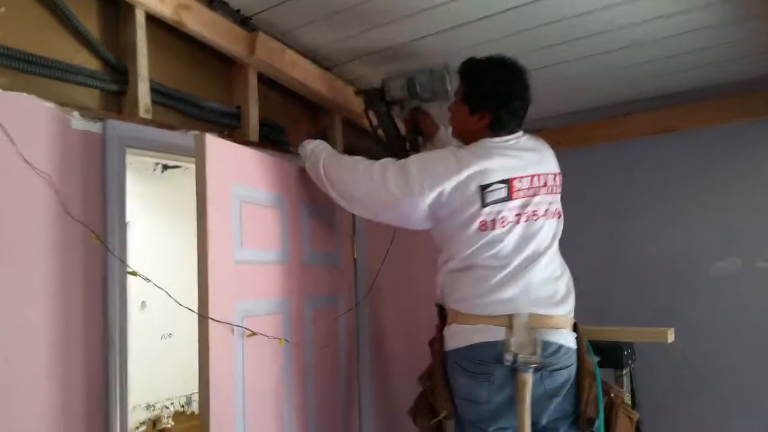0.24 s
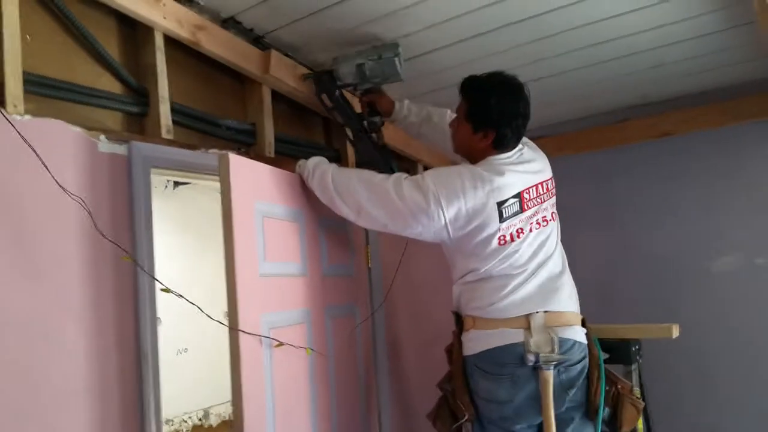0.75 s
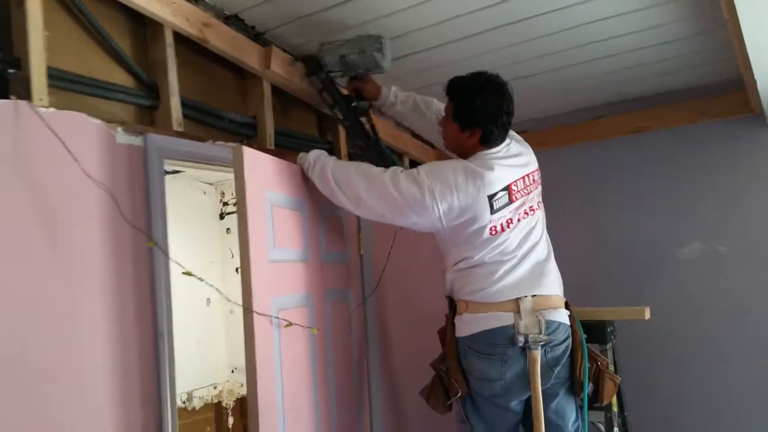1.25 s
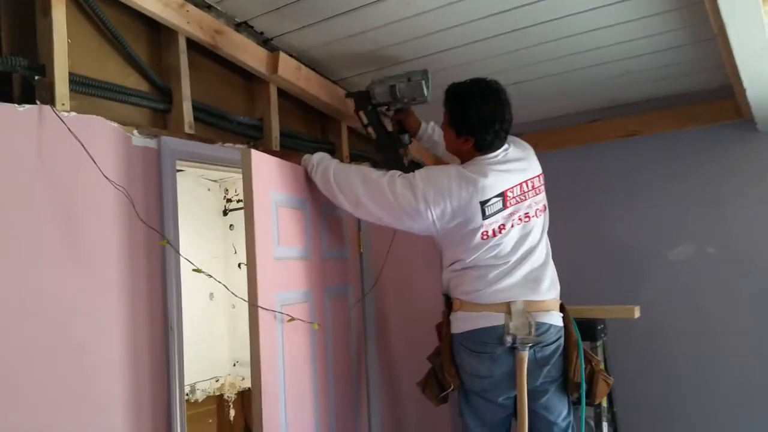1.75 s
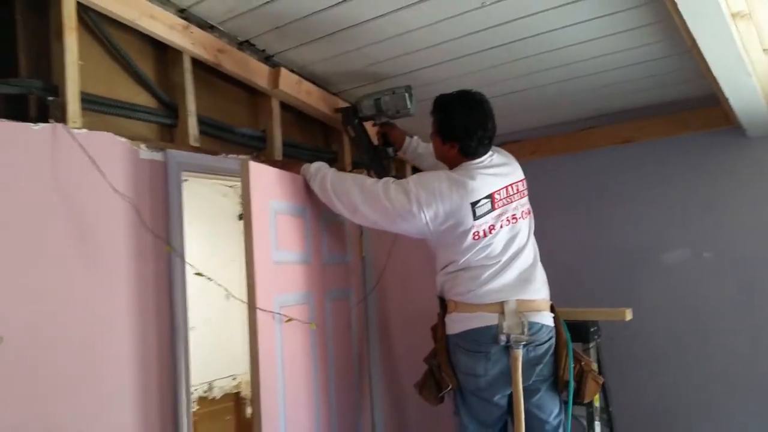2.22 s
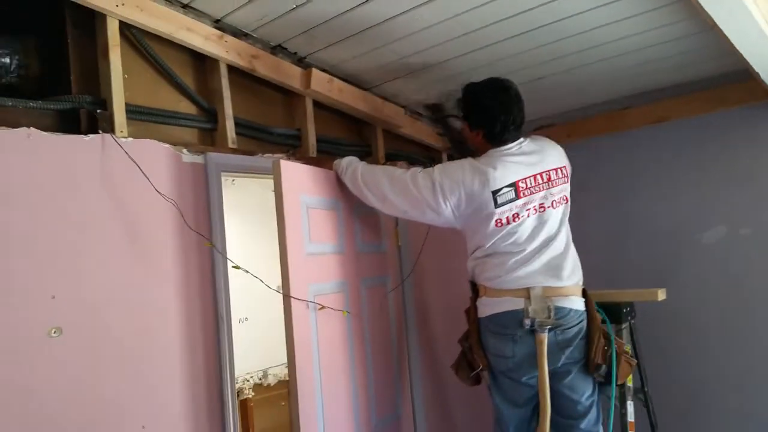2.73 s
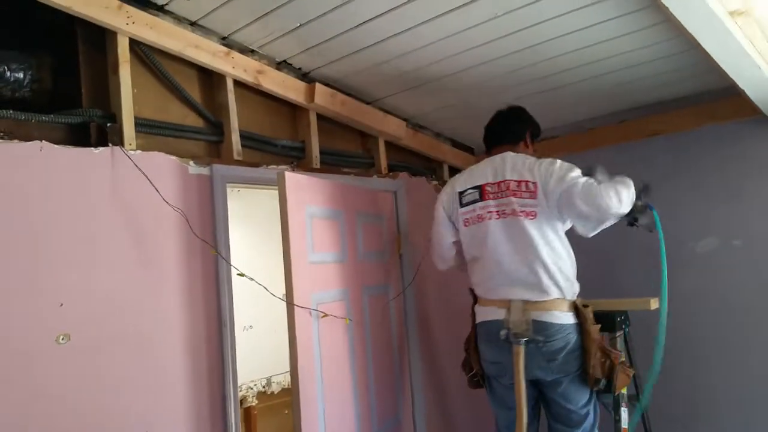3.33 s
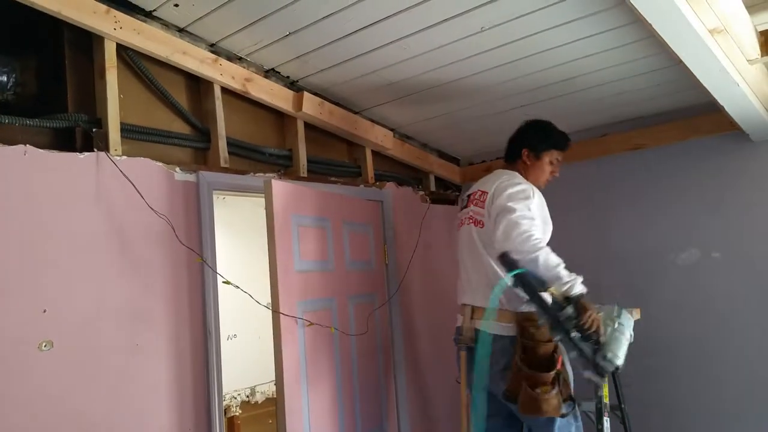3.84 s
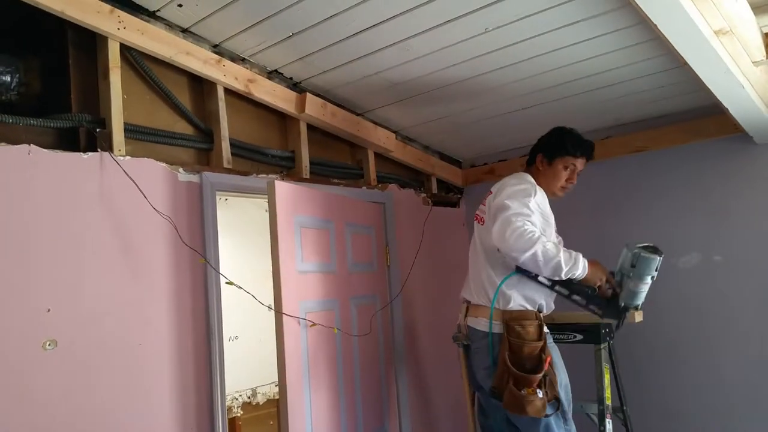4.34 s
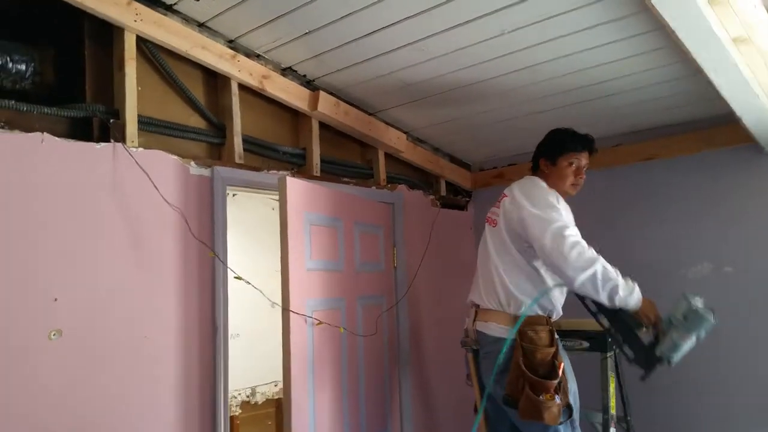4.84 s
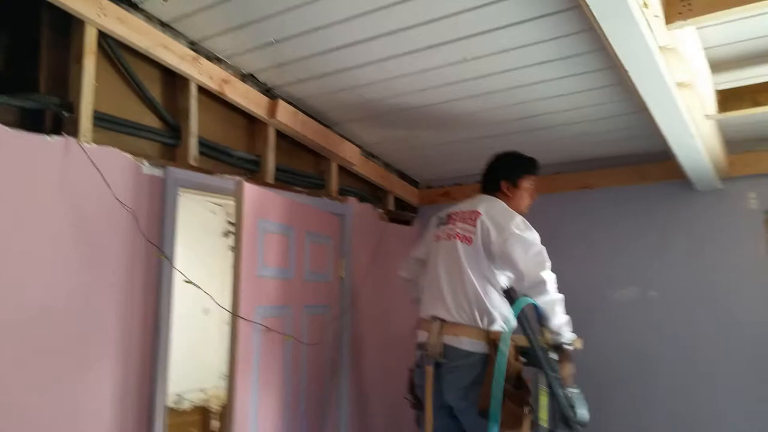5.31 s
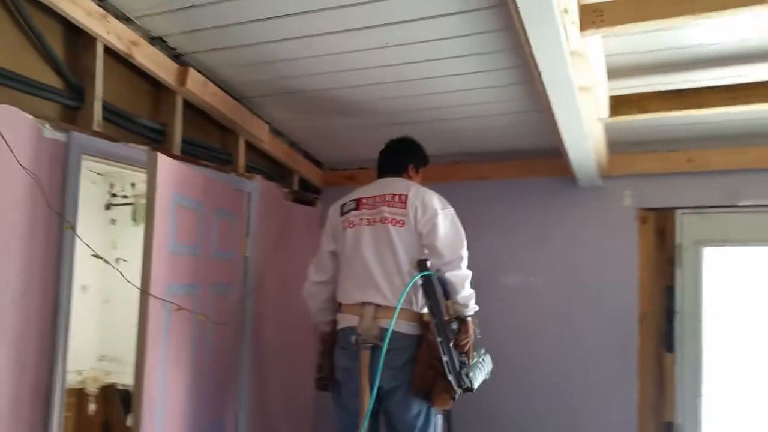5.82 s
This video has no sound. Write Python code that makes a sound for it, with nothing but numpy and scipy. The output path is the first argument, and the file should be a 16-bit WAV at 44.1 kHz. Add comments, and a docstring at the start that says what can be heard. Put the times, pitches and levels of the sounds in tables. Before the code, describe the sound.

A small air compressor fades in, humming and buzzing steadily with a rough clatter in a bare room. An air nail gun fires twice into a wooden beam, about a second apart, each shot a sharp double crack with a thud and a rush of air. The compressor sounds quieter after each blow, then swells back. Light clicks, brief metal squeaks and a clank follow as the tool is lowered. The microphone moves slightly.

```python
"""Air compressor and nailer in a bare room

A small piston compressor hums and buzzes at harmonics of its shaft rate, over the noise of its valves.
An air nailer fires twice into a beam: each impact excites housing and timber, and exhaust air follows.
The tool is then lowered with squeaks, scuffs and a clank. The sound fades in at a moving microphone,
whose gain control holds the compressor down for a while after each loud blow."""
import sys
import numpy as np
from scipy import signal
from scipy.fft import rfft, irfft
from scipy.io import wavfile
from scipy.ndimage import uniform_filter1d, minimum_filter1d

SR = 44100
rng = np.random.default_rng(int(sys.argv[2]) if len(sys.argv) > 2 else 0)


def store_wav(level_fs):
    """Save 16-bit WAV to argv[1]."""
    pcm = np.round(np.clip(np.atleast_2d(level_fs), -1, 1) * 32767)
    wavfile.write(sys.argv[1], SR, pcm.T.astype(np.int16))


N = 267687
TIME = np.arange(N) / SR
FREQS = np.fft.rfftfreq(N, 1 / SR)
SHAFT_HZ, SLOWING_HZ_PER_S = 44.0, 0.027

# Harmonics of the pump's hum: shaft order, relative level/dB
HUM_ORDERS = [(1, -35), (2, -21.5), (3, -17.5), (4, -35.5), (5, -3.5), (6, -18), (7, -12.5), (8, -8),
              (9, -9), (10, -11), (11, -20.5), (12, -9), (13, -3), (14, -6), (15, 0.5), (16, -7), (17, 0),
              (18, -2), (19, -5.5), (20, -11)]
# Spectral envelope of the pump's metal buzz: f/Hz, relative level/dB
BUZZ_ENVELOPE = [(860, -40), (1300, -45), (1600, -45), (2200, -36.5), (2700, -46), (3500, -56),
                 (4500, -50.5), (6000, -58.5), (9000, -84)]
# Resonances that lift the nearest shaft order: f/Hz, relative level/dB
PUMP_RESONANCES = [(1007, -37), (1050, -40), (1098, -40.5), (1227, -43), (1270, -37), (1314, -40),
                   (1362, -37), (1448, -38), (1620, -41), (1841, -49), (2019, -46), (2148, -38.5),
                   (2191, -34.5), (2326, -39), (2369, -40.5), (4167, -47), (4474, -40.5), (4780, -42.5)]
# Spectrum of valve clatter and intake air: f/Hz, relative density/dB
CLATTER_SPECTRUM = [(30, -23), (70, -21.5), (160, -9), (330, -5), (750, 3), (1050, 0.5), (1600, -1),
                    (2300, 0.5), (2850, -12.5), (3600, -14.5), (4600, -15), (6200, -20.5), (7500, -19.5),
                    (8300, -24), (9700, -22), (11000, -25), (12000, -22.5), (15500, -29)]
# Likeness of the clatter at the two ears: f/Hz, coherence (0-1)
CLATTER_COHERENCE = [(40, 0.2), (200, 1), (600, 0.54), (1100, 0.61), (3000, 0.32), (12000, 0.12)]
# Stereo balance of the compressor: f/Hz, left minus right level/dB
PUMP_BALANCE = [(80, 2.5), (220, -1), (450, 1.5), (640, 4.5), (780, -0.5), (1100, -1.5), (1700, -1.5),
                (4000, 0.5), (12000, -1.5)]
# Nailer shots: t/s, crack level/dB, driver return level/dB, timber level/dB, air decay time/s
NAIL_SHOTS = [(1.182, 10, 3, 1, .13), (2.389, 8.5, 4.5, -8.5, 0.12)]
# Spectrum of the driver's impact: f/Hz, relative density/dB
CRACK_SPECTRUM = [(60, -10), (300, -3), (700, 6.5), (1200, 4), (2100, 5), (3000, 1.5), (5700, -0.5),
                  (8000, -6), (15500, -9)]
# Spectrum of the struck beam and wall: f/Hz, relative density/dB
TIMBER_SPECTRUM = [(30, -13), (45, -32), (62, 0), (100, -13), (140, 4.5), (200, -1), (330, 0), (600, -10.5),
                   (1100, -10.5), (2500, -26), (9000, -60)]
# Spectrum of the escaping air: f/Hz, relative density/dB
AIR_SPECTRUM = [(50, -35), (160, -25), (400, -2), (640, 2), (900, -7), (1800, -3), (3000, -8), (5500, -10),
                (9000, -11), (15700, -9)]
# Resonances of the nailer's metal housing: f/Hz, bandwidth/Hz, lift/dB
HOUSING_MODES = [(1890, 67, 1), (3480, 180, 1), (5600, 630, 5)]
# Clicks and scuffs of the handled tool: t/s, level/dB, decay time/s, centre f/Hz
HANDLING_BURSTS = [(1.07, -21.5, 0.0077, 10750), (2.328, -17, 0.0086, 5070), (3.09, -22, 0.011, 4940),
                   (4.7, -33, 0.17, 6500), (4.868, -25, 0.055, 6060), (4.955, -18, 0.03, 9000),
                   (4.968, -8, .022, 3300), (5.086, -19, 0.012, 5970), (5.484, -22, 0.0029, 4680),
                   (5.65, -23, 0.0061, 7430)]
# Metal squeaks and rings as the worker shifts: t/s, level/dB, duration/s, f/Hz, spread/Hz
METAL_SQUEAKS = [(3.947, -14, 0.022, 3300, 12), (4.057, -14.5, 0.027, 820, 28),
                 (4.068, -27, .025, 2595, 32), (4.071, -17.5, 0.048, 1195, 33),
                 (4.965, -8.5, 0.02, 1786, 67), (4.967, -12, 0.026, 1967, 680),
                 (5.662, -26.5, 0.0084, 11380, 150)]
# Path of the microphone: t/s, place in the standing waves (0-1), bass level/dB, treble level/dB
MIC_PATH = [(1.15, 0.34, 12, 0.5), (2.5, 0, 2.5, -0.74), (4.9, 0, .5, 1.5), (5.9, 0.59, -3.5, -1)]
# Standing waves of the room: f/Hz, half-width/Hz, gain from place 0 to place 1/dB
ROOM_MODES = [(395, 25, 5), (445, 25, -6), (605, 34, 7.5), (680, 35, -5), (788, 27, 7.5), (850, 35, -6)]
# Reverberation time of the room: f/Hz, T60/s
ROOM_T60 = [(100, 1), (500, 0.44), (2000, 0.56), (6000, 0.5), (14000, 0.22)]


def compressor():
    """Superposition: hum and buzz, locked to one shaft, add to the broadband clatter."""
    turns = shaft_turns()
    return standing_waves(hum(turns)) + buzz(turns) + clatter()


def shaft_turns(jitter_turns=0.0014, zero_phase_s=4.4985):
    """Phase is the integral of speed: the shaft slows as the tank fills, at a slightly uneven pace."""
    turns = np.cumsum(SHAFT_HZ - SLOWING_HZ_PER_S * TIME) / SR
    return turns - np.interp(zero_phase_s, TIME, turns) + jitter_turns * drift(32)


def hum(turns, level_db=-21.5, knock_hz=720, knock_width_hz=230, blur_rad=0.9):
    """Periodic knocks in the pump head give harmonics; the room scrambles phases off the knock's band."""
    orders, db = np.transpose(HUM_ORDERS)
    hz = SHAFT_HZ * orders
    scramble_rad = 2 * (1 - np.exp(-((hz - knock_hz) / knock_width_hz) ** 4))
    lines = amplitude(db) * np.exp(1j * (blur_rad + scramble_rad) * rng.standard_normal(len(hz)))
    lines /= np.linalg.norm(lines)
    ears = pump_balance(hz) + np.array([[1j], [-1j]]) * 0.3 * np.sqrt(hz / knock_hz)  # the left leads
    tone = wavering(turns, lines * ears, waver_db=-10.5, waver_hz=14, copies=2)
    return tone * amplitude(level_db - 0.24 * drift(16))  # no two strokes are equally hard


def buzz(turns, uneven_db=5, resonance_lift_db=3):
    """Forced vibration: high shaft orders drive the pump's metal, and those at a resonance stand out."""
    final_hz = SHAFT_HZ - SLOWING_HZ_PER_S * TIME[-1]
    hz = final_hz * np.arange(len(HUM_ORDERS) + 1, BUZZ_ENVELOPE[-1][0] // final_hz + 1)
    line_db = lookup(BUZZ_ENVELOPE, hz) + uneven_db * rng.uniform(-1.42, 1, (2, len(hz)))
    for resonance_hz, db in PUMP_RESONANCES:
        line_db[:, np.argmin(abs(hz - resonance_hz))] = db + resonance_lift_db
    lines = random_phases(amplitude(line_db)) * pump_balance(hz)
    lines = np.pad(lines, ((0, 0), (len(HUM_ORDERS), 0)))  # the low orders belong to the hum
    return wavering(turns, lines, waver_db=1, waver_hz=1.57, copies=4)


def wavering(turns, lines, waver_db, waver_hz, copies):
    """Interference: each order flickers on its own as loose parts and echo paths shift."""
    loose = sum(drift(waver_hz) * harmonic_wave(turns, random_phases(lines)) for _ in range(copies))
    share = amplitude(waver_db)
    return (harmonic_wave(turns, lines) + share * loose / np.sqrt(copies)) / np.hypot(1, share)


def harmonic_wave(turns, lines, size=4096):
    """Fourier synthesis: complex shaft orders sum to a wave that repeats once a turn at each ear."""
    periods = irfft(np.pad(lines, ((0, 0), (1, 0))), size) * size / np.sqrt(2)
    return np.array([np.interp(turns % 1, np.arange(size) / size, wave, period=1) for wave in periods])


def clatter(level_db=-22, flutter_db=1.25, right_lag_s=0.00043):
    """Partial coherence: fluttering valve and intake noise reaches the right ear later and partly alike."""
    left, independent = rfft(rng.standard_normal((2, N)))
    coherence = lookup(CLATTER_COHERENCE, FREQS)
    delayed = left * np.exp(-2j * np.pi * FREQS * right_lag_s)
    right = coherence * delayed + np.sqrt(1 - coherence ** 2) * independent
    colour = amplitude(lookup(CLATTER_SPECTRUM, FREQS)) * pump_balance(FREQS)
    noise = irfft(np.array([left, right]) * colour, N)
    return unit_rms(noise) * amplitude(level_db + flutter_db * drift(65))


def pump_balance(hz):
    """Interaural level difference: the compressor's left and right gains depend on frequency."""
    return ear_gains(lookup(PUMP_BALANCE, hz))


def nailer(crack_decay_s=0.02, boom_decay_s=0.045, air_db=3, exhaust_delay_s=0.162):
    """Impact and jet noise: driver cracks, timber booms and air rushes, on the shot and on the return."""
    impacts, air, t = np.zeros((2, N)), np.zeros((2, N)), TIME[:SR]
    impact_rise = np.minimum(t / 0.0022, 1)
    air_rise = 1 - np.exp(-t / 0.0027)
    for shot_s, shot_db, return_db, timber_db, air_s in NAIL_SHOTS:
        drive = (shot_s, shot_db, air_s)
        exhaust = (shot_s + exhaust_delay_s, return_db, 0.88 * air_s)
        for start_s, crack_db, rush_s in (drive, exhaust):
            crack = housing_noise(CRACK_SPECTRUM, crack_db, ragged_db=3, stereo_spread=1)
            boom = housing_noise(TIMBER_SPECTRUM, timber_db, ragged_db=4, stereo_spread=0.2)
            rush = housing_noise(AIR_SPECTRUM, air_db, ragged_db=1, stereo_spread=0.68)
            impact = crack * np.exp(-t / crack_decay_s) + boom * np.exp(-t / boom_decay_s)
            add(impacts, start_s, impact * impact_rise)
            add(air, start_s, rush * air_rise * gaussian(t, 0, rush_s))
    return reverberate(impacts, wet_db=-2) + reverberate(air, wet_db=1.5) * ear_gains(-1.5)


def housing_noise(spectrum, level_db, ragged_db, stereo_spread):
    """Source and filter: the housing's resonances colour one second of ragged stereo noise."""
    hz = np.fft.rfftfreq(SR, 1 / SR)
    lift_db = sum(db / (1 + (2 * (hz - mode_hz) / width) ** 2) for mode_hz, width, db in HOUSING_MODES)
    mid, side = rfft(rng.standard_normal((2, SR)))
    ears = np.array([mid + stereo_spread * side, mid - stereo_spread * side])
    noise = irfft(ears * amplitude(lookup(spectrum, hz) + lift_db), SR)
    return unit_rms(noise) * amplitude(level_db + ragged_db * drift(114)[:SR])


def handling(trigger_lead_s=0.035, trigger_db=-14, trigger_decay_s=0.02, trigger_hz=2960):
    """Contact noise: trigger, nail strip and tool belt give broad bursts that decay exponentially."""
    bursts, t = np.zeros(N), TIME[:SR // 2]
    hz = np.fft.rfftfreq(len(t), 1 / SR)
    triggers = [(shot[0] - trigger_lead_s, trigger_db, trigger_decay_s, trigger_hz) for shot in NAIL_SHOTS]
    for start_s, db, decay_s, centre_hz in triggers + list(HANDLING_BURSTS):
        hump = np.exp(-0.5 * np.log((hz + 1) / centre_hz) ** 2)
        noise = unit_rms(irfft(rfft(rng.standard_normal(len(t))) * hump, len(t)))
        add(bursts, start_s, amplitude(db) * noise * np.exp(-t / decay_s))
    return reverberate(bursts, wet_db=4)


def squeaks():
    """Friction: metal rubbing on metal gives brief tones, rough in amplitude and phase."""
    tones = np.zeros(N)
    for start_s, db, duration_s, hz, spread_hz in METAL_SQUEAKS:
        t = TIME[:round(duration_s * SR)]
        grip = (drift(spread_hz) + 1j * drift(spread_hz))[:len(t)]
        tone = unit_rms((grip * np.exp(2j * np.pi * hz * t)).real)
        add(tones, start_s, amplitude(db) * tone * signal.windows.tukey(len(t), 0.5))
    return reverberate(tones, wet_db=0)


def standing_waves(x):
    """Room modes: some tones swell and others sink as the microphone moves between nodes and antinodes."""
    place, _, _ = mic_path()
    change_db = sum(db * gaussian(FREQS, hz, width) for hz, width, db in ROOM_MODES)
    return (1 - place) * x + place * filtered(x, amplitude(change_db))


def moving_microphone(x, dip_s=2.076, dip_hz=410, dip_depth=0.86):
    """Time-varying filtering: bass and treble follow the microphone's path; the low mids dip briefly."""
    _, bass_db, treble_db = mic_path()
    bass = filtered(x, lowpass(305) - lowpass(54.7))
    treble = filtered(x, 1 - lowpass(930))
    low_mids = filtered(x, gaussian(FREQS, dip_hz, width=420))
    dip = dip_depth * gaussian(TIME, dip_s, width=0.19)
    return x + bass * (amplitude(bass_db) - 1) + treble * (amplitude(treble_db) - 1) - low_mids * dip


def mic_path():
    """Linear interpolation gives place, bass level and treble level at every sample."""
    times, *columns = np.transpose(MIC_PATH)
    return [np.interp(TIME, times, column) for column in columns]


def reverberate(x, wet_db, coherent_hz=500):
    """Diffuse field: a dense tail follows the direct sound, each band dying at its own rate."""
    hz, t, (left, independent) = signal.stft(rng.standard_normal((2, SR)), SR, nperseg=256)
    coherence = 0.99 * np.exp(-hz[:, None] / coherent_hz)  # long waves reach both ears alike
    right = coherence * left + np.sqrt(1 - coherence ** 2) * independent
    decay = amplitude(-60 * t / lookup(ROOM_T60, hz)[:, None])
    tail = signal.istft(np.array([left, right]) * decay, SR, nperseg=256)[1]
    tail *= ramp(0.002, 0.0037)[:tail.shape[1]]
    wet = signal.fftconvolve(np.atleast_2d(x), tail / np.linalg.norm(tail[0]), axes=1)[:, :N]
    return (x + amplitude(wet_db) * wet) / np.hypot(1, amplitude(wet_db))


def gain_control(x, limit_db=-14.5, range_db=15.5, give_back_db=2, hold_s=0.87, recover_db_per_s=37):
    """Compression: the gain drops for a loud blow, gives a little back, holds, then recovers."""
    look_ahead_s, smoothing_s = 0.009, 0.038
    power_db = 10 * np.log10(abs(uniform_filter1d((x ** 2).mean(0), size=1000)) + 1e-12)
    excess_db = np.interp(TIME + look_ahead_s, TIME, power_db - limit_db)
    hold = round(hold_s * SR)
    recent_peak_db = -minimum_filter1d(-excess_db, hold, origin=(hold - 1) // 2, mode="constant")
    wanted_db = np.clip(np.maximum(excess_db, recent_peak_db - give_back_db), 0, range_db)
    recovery_db = TIME * recover_db_per_s
    cut_db = np.maximum.accumulate(wanted_db + recovery_db) - recovery_db
    return x / amplitude(uniform_filter1d(cut_db, round(smoothing_s * SR)))


def amplitude(db):
    """Amplitude ratio of a level in decibels."""
    return 10 ** (np.asarray(db) / 20)


def ear_gains(left_minus_right_db):
    """A level difference split evenly between the ears."""
    return amplitude(np.array([[0.5], [-0.5]]) * left_minus_right_db)


def unit_rms(x):
    """Normalisation to rms 1."""
    return x / np.sqrt(np.mean(x ** 2) + 1e-20)


def lookup(table, hz):
    """Interpolation on a logarithmic frequency axis."""
    table_hz, values = np.transpose(table)
    return np.interp(np.log(hz + 1), np.log(table_hz + 1), values)


def add(mix, start_s, sound):
    """Superposition of a sound on the mix from start_s on."""
    part = mix[..., round(start_s * SR):][..., :sound.shape[-1]]
    part += sound[..., :part.shape[-1]]


def random_phases(lines):
    """Rotation of each spectral line by a random angle."""
    return lines * np.exp(2j * np.pi * rng.random(lines.shape))


def drift(hz):
    """Random fluctuation of rms 1, band-limited to about hz."""
    return unit_rms(filtered(rng.standard_normal(N), gaussian(FREQS, 0, hz)))


def filtered(x, response):
    """Filtering as multiplication of the spectrum."""
    return irfft(rfft(x) * response, N)


def lowpass(hz):
    """Fourth-order low-pass response, one half at hz."""
    return 1 / (1 + (FREQS / hz) ** 4)


def gaussian(x, centre, width):
    """Bell curve of height 1, down to 1/e at centre +/- width."""
    return np.exp(-((x - centre) / width) ** 2)


def ramp(start_s, rise_s):
    """Linear rise from 0 to 1."""
    return np.clip((TIME - start_s) / rise_s, 0, 1)


def scene():
    """Superposition of the compressor, the nailer and the worker's small noises."""
    return moving_microphone(compressor()) + nailer() + handling() + squeaks()


def record(dry, cutoff_hz=15900):
    """Signal chain: gain control, a fade-in from silence, full-scale clipping and a band limit."""
    fade_in = ramp(0.29, 0.84) ** 1.77 * ramp(0.357, 0.009)
    clipped = np.clip(gain_control(dry) * fade_in, -1, 1)
    band_limit = signal.firwin(511, cutoff_hz, window=("kaiser", 9), fs=SR)
    return signal.oaconvolve(clipped, band_limit[None], "same")


dry = scene()
out = record(dry)
store_wav(out)
```